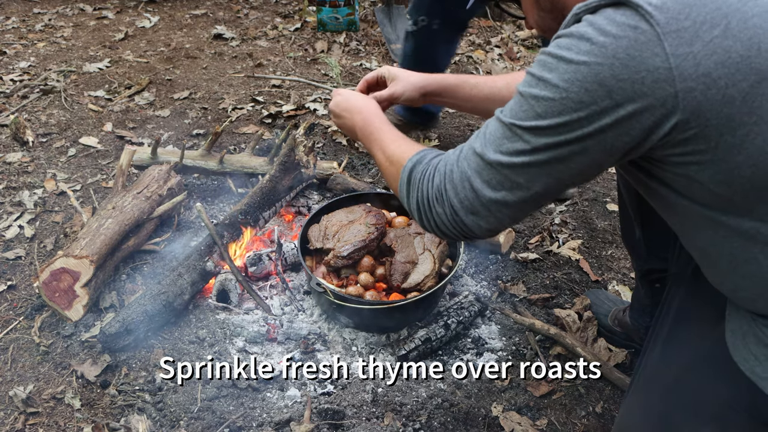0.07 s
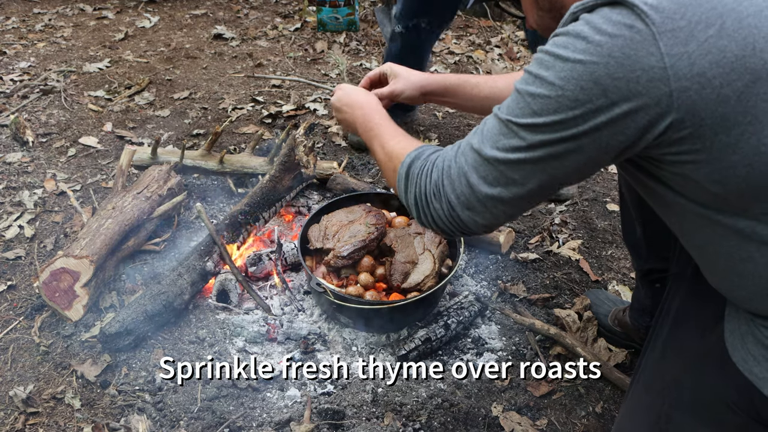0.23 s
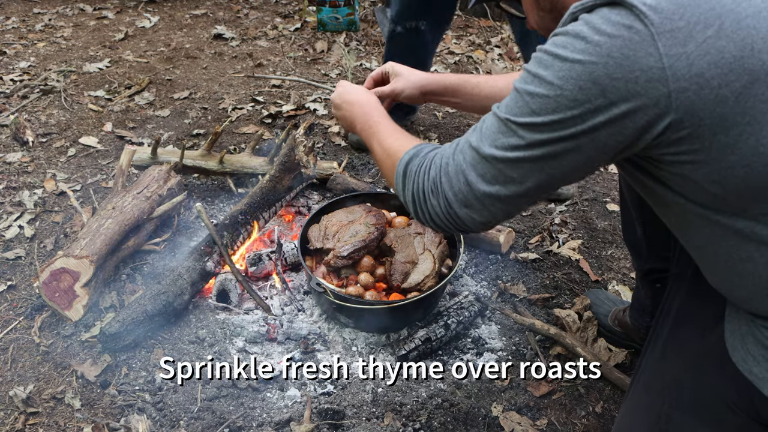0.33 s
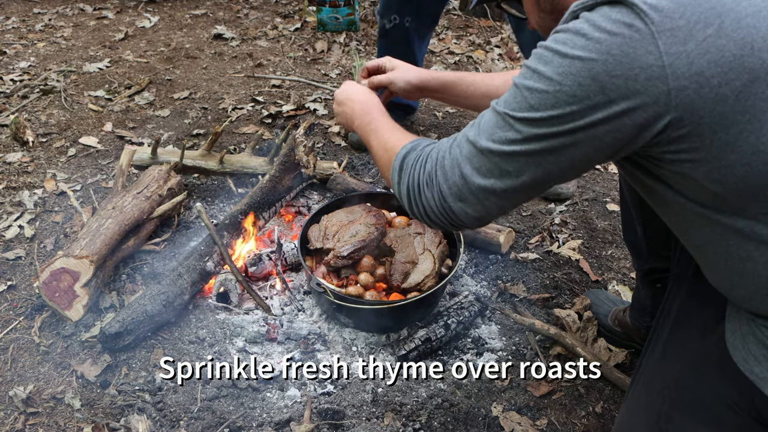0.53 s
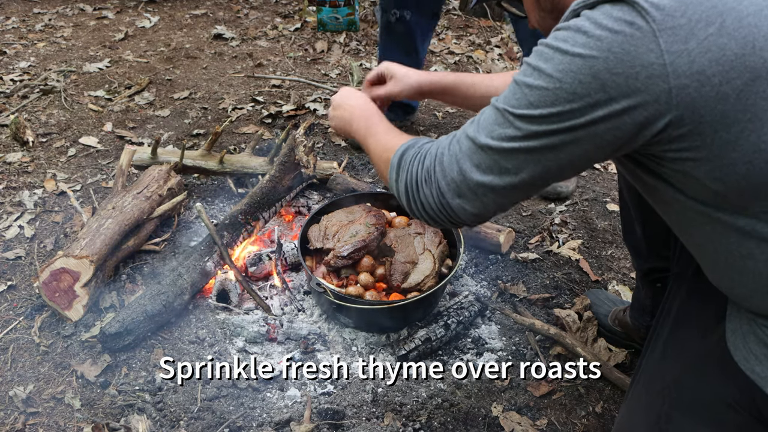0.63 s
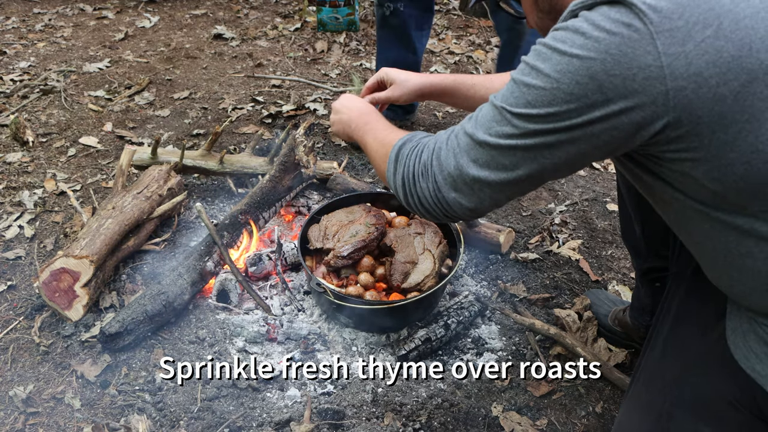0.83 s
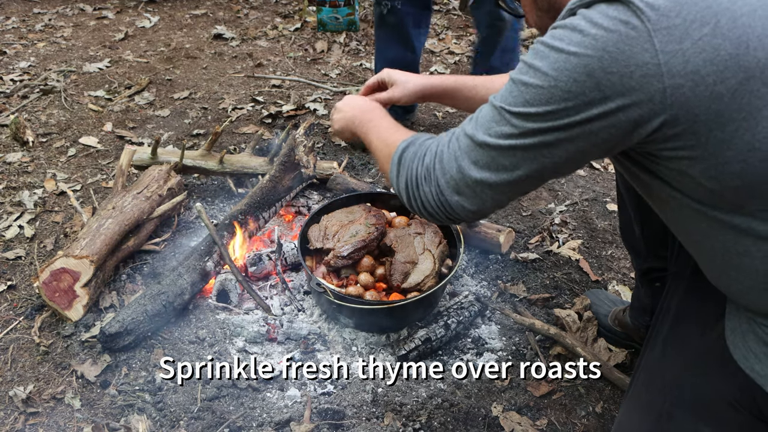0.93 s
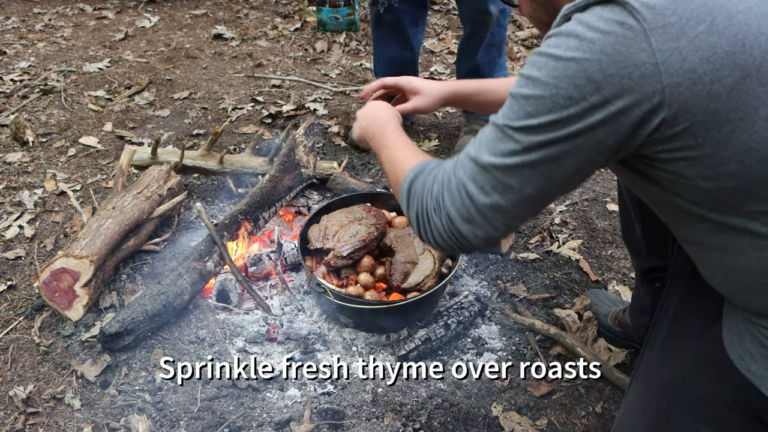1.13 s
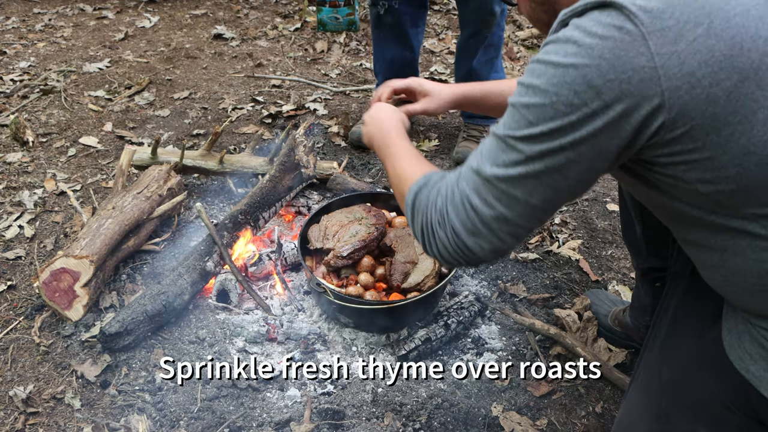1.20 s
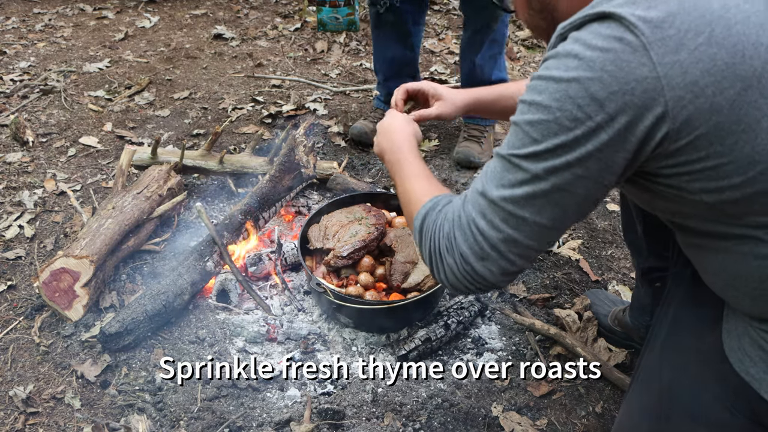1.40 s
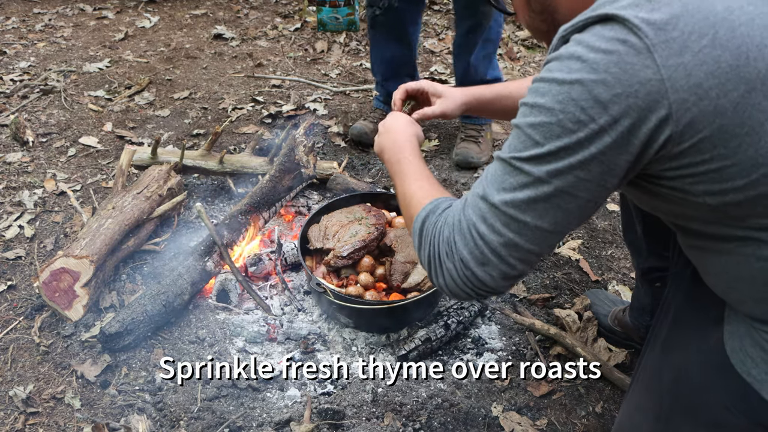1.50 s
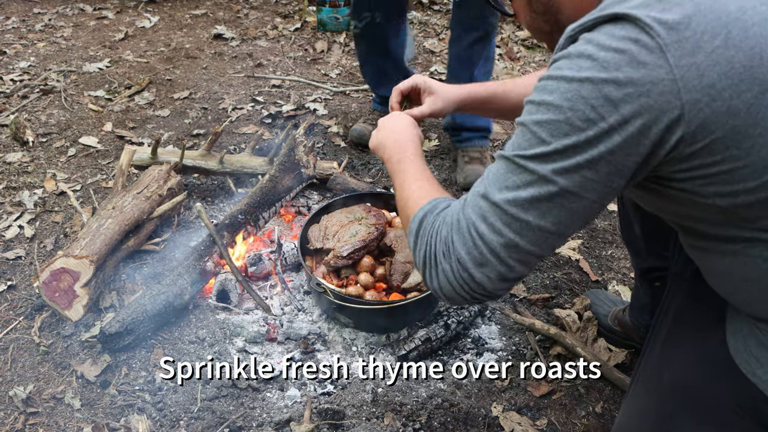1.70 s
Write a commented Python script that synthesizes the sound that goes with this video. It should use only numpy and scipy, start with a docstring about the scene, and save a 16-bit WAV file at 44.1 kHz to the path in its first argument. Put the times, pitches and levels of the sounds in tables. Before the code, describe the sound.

Meat sizzling densely in a heavy pot on a campfire, with crackles and a wind thump

```python
"""A dense sizzle in surges comes first: a roast in a heavy pot on a campfire, over a low outdoor murmur.
Countless random steam bursts, hiss and short bubble rings make the sizzle; filtered noise makes the murmur.
A puff of air soon buffets the microphone with a dull thump: damped low swings inside a swell of noise.
Sharper crackles are brief resonant noise bursts; soft knocks are damped swings.
Later, faint wavering sine tones ring underneath."""
import sys
import numpy as np
from scipy import signal
from scipy.fft import rfft, irfft
from scipy.io import wavfile

SR = 44100
rng = np.random.default_rng(int(sys.argv[2]) if len(sys.argv) > 2 else 0)


def generate_wav(sig):
    """Save sig (samples, or channels by samples) to the path in sys.argv[1] as 16-bit PCM at SR."""
    pcm = np.round(np.clip(np.atleast_2d(sig).T, -1, 1) * 32767).astype(np.int16)
    wavfile.write(sys.argv[1], SR, pcm)


N = 77175
TOP_HZ = 15650  # upper edge of the finished sound


def undb(db):
    """Decibels to gain."""
    return 10 ** (np.asarray(db) / 20)


def unit(x):
    """Scale to rms 1."""
    return x / np.sqrt(np.mean(x ** 2))


def curve(rows, axis=1):
    """One column of a time table at every sample."""
    rows = np.array(rows, float)
    return np.interp(np.arange(N) / SR, rows[:, 0], rows[:, axis])


def freqs():
    """Frequency of each spectral bin in Hz, kept above zero."""
    return np.maximum(np.fft.rfftfreq(N, 1 / SR), 1)


def shape(points):
    """A frequency table at every bin, interpolated over log frequency."""
    hz, value = np.array(points, float).T
    return np.interp(np.log(freqs()), np.log(hz), value)


def filtered(x, gain):
    """Apply a gain per bin."""
    return irfft(rfft(x) * gain, N)


def resonance(hz, q):
    """Response of a band-pass."""
    return 1 / (1 + 1j * q * (freqs() / hz - hz / freqs()))


def pan(db):
    """Left and right gains for a level difference, left minus right."""
    return undb(np.array([[.5], [-.5]]) * db)


def since(start):
    """Seconds since a moment, zero before it."""
    return np.maximum(np.arange(N) / SR - start, 0)


def walk(rate):
    """Smooth random wandering of rms 1; rate is its corner in Hz."""
    return unit(filtered(rng.standard_normal(N), 1 / (1 + (freqs() / rate) ** 2)))


def air(likeness):
    """Stereo noise with a shared part, likeness being its share of the power."""
    noise = rng.standard_normal((3, N))
    return np.sqrt(likeness) * noise[2] + np.sqrt(1 - likeness) * noise[:2]


def thud(start, hz, cycles, edge_hz):
    """A sudden push that swings out within a cycle or two; peak 1."""
    turns = since(start) * hz
    swing = np.sin(2 * np.pi * turns) * np.exp(-turns / cycles)
    low_cut = 1j * freqs() / (hz / 2 + 1j * freqs())
    soft_edge = 1 / np.sqrt(1 + (freqs() / edge_hz) ** 4)
    x = filtered(swing, low_cut * soft_edge)
    return x / np.abs(x).max()


BUBBLE_LOW_HZ, BUBBLE_HIGH_HZ = 1494.6, 12840
BUBBLE_CYCLES, BUBBLE_SPREAD_DB = 44, 0.5  # cycles of decay, unevenness of level


def bubbles(count=900):
    """Small bubbles ring briefly as they burst, at random times and pitches, each rising slightly."""
    t = np.arange(SR // 20) / SR
    out = np.zeros((2, N + len(t)))
    for when, pitch, size, side in rng.random((count, 4)):
        hz = BUBBLE_LOW_HZ * (BUBBLE_HIGH_HZ / BUBBLE_LOW_HZ) ** pitch
        turns = hz * t
        tone = np.sin(2 * np.pi * turns * (1 + 1.16 * t))
        ring = tone * np.exp(-turns / BUBBLE_CYCLES) * hz ** 0.93  # higher rings are stronger
        level = undb(-BUBBLE_SPREAD_DB * np.log(size + 0.0087))
        i = int(when * N)
        out[:, i:i + len(t)] += ring * level * pan(12 * (side - .5))
    return unit(out[:, :N])


SPUTTER_DB, SPUTTER_RATE_HZ, SPUTTER_BAND_HZ = 1.5, 9, 400  # rms swing, its corner, band spacing


def sputter(x):
    """The fat sputters: narrow overlapping ranges swell and sink, each by itself."""
    place, spectrum = freqs() / SPUTTER_BAND_HZ, rfft(x)
    out = 0
    for k in range(TOP_HZ // SPUTTER_BAND_HZ + 2):
        band = irfft(spectrum * np.maximum(1 - np.abs(place - k), 0), N)
        out = out + band * undb(SPUTTER_DB * walk(SPUTTER_RATE_HZ))
    return out


POT_ECHO_DB, POT_ECHO_S = -11.5, 0.0033  # total echo energy against the direct sound, decay


def pot_walls(x):
    """The pot walls throw the sizzle back within milliseconds and ripple its spectrum."""
    t = since(0)
    echoes = rng.standard_normal(N) * np.exp(-t / POT_ECHO_S) * (t > .001)
    echoes = echoes / np.sqrt(np.sum(echoes ** 2))
    return filtered(x, 1 + undb(POT_ECHO_DB) * rfft(echoes))


# relative colour of the sizzle: f/Hz, level/dB per Hz
SIZZLE_COLOUR = [(80, -34), (250, -8.5), (550, -2), (900, -0.5), (1300, 0), (2100, 0.4), (2700, 1.5),
                 (3300, -2), (3900, -5), (4600, -2.5), (5400, -5.5), (7200, -3.5), (9500, -6.5),
                 (11400, -1), (13000, -1.5), (14200, -8), (15700, -16)]
# stereo tilt of that colour: f/Hz, left minus right/dB (before the hiss pan)
SIZZLE_BALANCE = [(300, -5), (900, 0.5), (1600, -2.5), (2700, -2.5), (3300, -2), (5000, -10.5), (7700, -13),
                  (11000, -2), (13000, 2), (15500, 10)]
# power share of bursts and steam common to both channels: f/Hz, share/0-1
SIZZLE_LIKENESS = [(300, 0.47), (1200, 0.72), (3000, 0.48), (5000, 0.48), (8000, 0.31), (12000, 0)]
# surges of the sizzle, before trim and pan: t/s, body level/dB, hiss level/dB, fizz level/dB
SIZZLE_SURGES = [(0.0, -48.5, -50, -52), (0.052, -47, -46.5, -55.5), (0.15, -46, -46, -52),
                 (0.31, -47, -44.5, -51), (0.385, -47.5, -47.5, -54), (0.424, -49, -50, -54.5),
                 (0.455, -49.5, -52, -50.5), (0.486, -49, -47, -54.5), (0.56, -50, -50.5, -52.5),
                 (0.658, -47.5, -48, -52.5), (0.686, -48.5, -46, -53.5), (0.74, -49, -51, -52.5),
                 (0.818, -50.5, -51.5, -53), (1.0, -49.5, -51.5, -54), (1.09, -47, -50.5, -53.5),
                 (1.11, -49, -47.5, -50), (1.212, -49.5, -51.5, -53.5), (1.29, -48.5, -51.5, -56),
                 (1.33, -47.5, -51.5, -55), (1.4, -48, -49, -54), (1.466, -44.5, -47, -49.5),
                 (1.558, -49.5, -46.5, -52), (1.61, -49.5, -47, -51.5), (1.672, -51, -52, -52),
                 (1.734, -46.5, -46, -52), (1.75, -49, -57, -49)]
# extra pan of the hiss: t/s, left minus right/dB
HISS_SIDE = [(0, 13), (.15, 10.5), (.42, 7), (.68, 11.5), (.8, 8.5), (1.15, 12), (1.75, 9)]
BODY_TOP_HZ, HISS_TOP_HZ = 3740, 9140
HISS_TRIM_DB, FIZZ_TRIM_DB, BUBBLE_DB = 1.5, 1.5, -13.5
BURSTS_PER_S, BURST_SPREAD_DB = 5000, 3  # bursts in each of three noise layers, unevenness of size
STEAM_SHARE, FLICKER_DB = 0.38, 0.07  # power share of smooth hiss, rms level flicker


def sizzle():
    """Tiny steam bursts of very unequal size and ringing bubbles over smooth hiss, surging in three ranges."""
    size = undb(BURST_SPREAD_DB * np.minimum(rng.exponential(size=(3, N)), 6))
    happens = rng.random((3, N)) < BURSTS_PER_S / SR
    bursts = unit(happens * size * rng.choice([-1, 1], (3, N)))
    steam = rng.standard_normal((3, N))
    fat = np.sqrt(1 - STEAM_SHARE) * bursts + np.sqrt(STEAM_SHARE) * steam

    common = np.clip(shape(SIZZLE_LIKENESS), 0, 1)
    stereo = filtered(fat[2], np.sqrt(common)) + filtered(fat[:2], np.sqrt(1 - common))
    in_pot = pot_walls(sputter(stereo + undb(BUBBLE_DB) * bubbles()))
    colour = undb(shape(SIZZLE_COLOUR)) * pan(shape(SIZZLE_BALANCE))
    x = filtered(in_pot, colour) * undb(FLICKER_DB * walk(44))

    below_hiss = 1 / (1 + (freqs() / BODY_TOP_HZ) ** 10)
    below_fizz = 1 / (1 + (freqs() / HISS_TOP_HZ) ** 10)
    body = unit(filtered(x, below_hiss)) * undb(curve(SIZZLE_SURGES, axis=1))
    hiss = unit(filtered(x, below_fizz - below_hiss)) * undb(HISS_TRIM_DB + curve(SIZZLE_SURGES, axis=2))
    fizz = unit(filtered(x, 1 - below_fizz)) * undb(FIZZ_TRIM_DB + curve(SIZZLE_SURGES, axis=3))
    return body + hiss * pan(curve(HISS_SIDE)) + fizz


# relative colour of the low noise: f/Hz, level/dB per Hz
LOW_COLOUR = [(25, -2), (60, -13), (110, 2), (180, 3), (260, 1.5), (370, -1.5), (520, -10), (900, -3),
              (2000, -67)]
# swell of the low noise: t/s, level/dB
LOW_SWELL = [(0, -53.5), (.3, -60.5), (.45, -68.5), (1.0, -63.5), (1.11, -61), (1.17, -52.5), (1.25, -54.5),
             (1.45, -57.5), (1.75, -52.5)]


def low_noise():
    """Low noise of fire and air, alike in both channels."""
    return unit(filtered(air(1.0), undb(shape(LOW_COLOUR)))) * undb(curve(LOW_SWELL))


# swell of the hollow murmur, before its waver: t/s, level/dB
MURMUR_SWELL = [(0, -63), (.95, -62.5), (1.16, -54), (1.3, -58.5), (1.75, -57.5)]
MURMUR_HZ, MURMUR_Q, MURMUR_WAVER_DB = 365.6, 2.94, 3


def murmur():
    """A hollow murmur: noise through a doubled resonance, its level wavering."""
    hollow = unit(filtered(air(0.91), resonance(MURMUR_HZ, MURMUR_Q) ** 2))
    return hollow * undb(curve(MURMUR_SWELL) + MURMUR_WAVER_DB * walk(8.2))


# coming and going of the deep rumble: t/s, level/dB
RUMBLE_SWELL = [(0, -60), (.3, -45.5), (.52, -77), (1.1, -90), (1.28, -56), (1.42, -56.5), (1.5, -71),
                (1.75, -69)]
RUMBLE_HZ, RUMBLE_Q = 79, 1.16


def rumble():
    """A deep rumble: wide noise through a doubled low resonance."""
    deep = unit(filtered(air(0.094), resonance(RUMBLE_HZ, RUMBLE_Q) ** 2))
    return deep * undb(curve(RUMBLE_SWELL))


# eddies striking the microphone, peak level before pan:
# t/s, level/dB, f/Hz, left minus right/dB, upper edge f/Hz
EDDIES = [(0.1352, -25, 114, -22, 696), (0.152, -34, 125, 0, 300), (0.172, -31.5, 115, 22, 300),
          (0.179, -22, 144, -13.5, 800), (0.2013, -17, 92, 6.5, 350), (0.2124, -23.5, 94, 13.5, 400),
          (0.2253, -20, 197, -10.5, 1500), (0.257, -31, 95, 16, 300), (.272, -26.5, 79.6, -11.5, 300),
          (0.292, -42, 60, -10, 160), (.461, -52.5, 111, 7, 400), (1.246, -40, 150, 7, 400),
          (1.279, -34.5, 113, -7, 300), (1.288, -43.5, 108, 0, 200), (1.39, -44, 112, 16, 400),
          (1.416, -43.5, 109, -8, 400)]
# relative colour of the puff's turbulence: f/Hz, level/dB per Hz
PUFF_COLOUR = [(20, -22), (45, -4), (90, -6), (160, -2), (300, -21), (600, -47), (1500, -66)]
EDDY_CYCLES, PORT_LAG_S = 0.49, 0.0021  # decay of each swing, delay of the weaker port
PUFF_DB, PUFF_S, PUFF_WIDTH_S = -35.5, 0.185, 0.066  # rms at full swell, centre, half-width


def wind():
    """Eddies hit one microphone port first and hardest, then the other, with a brief swell of turbulence."""
    eddies = 0
    for start, db, hz, side, edge_hz in EDDIES:
        left = thud(start + PORT_LAG_S * (side < 0), hz, EDDY_CYCLES, edge_hz)
        right = thud(start + PORT_LAG_S * (side > 0), hz, EDDY_CYCLES, edge_hz)
        eddies = eddies + np.array([left, right]) * undb(db) * pan(side)
    swell = np.exp(-((since(0) - PUFF_S) / PUFF_WIDTH_S) ** 6)
    turbulence = unit(filtered(air(0), undb(shape(PUFF_COLOUR))))
    return eddies + turbulence * swell * undb(PUFF_DB)


# spits and snaps, peak level before pan:
# t/s, level/dB, centre f/Hz, resonance Q, decay before the resonance/s, left minus right/dB
SPITS_AND_SNAPS = [(.158, -31.5, 8000, 2, 0.0085, -3), (.2808, -25, 1590, 0.87, 0.0011, -5),
                   (0.3125, -30, 13000, 2, .001, 10), (0.387, -30.5, 1370, 2.8, 0.0018, 3),
                   (.456, -37, 12000, 2, .002, -2), (.666, -36, 12000, 2, .005, 7),
                   (.684, -38, 13500, 2, 0.0099, 8), (.71, -36, 12900, 7, 0.0035, 6),
                   (.8735, -35, 5700, 1.5, 0.0038, 4), (1.11, -42, 6600, 1.7, .003, 16),
                   (1.128, -43, 2600, 1.2, 0.0033, 26), (1.175, -41, 6950, 1.3, 0.0033, 22),
                   (1.456, -32.5, 1100, 3, .004, -1), (.897, -42, 2700, 13, 0.03, -3),
                   (1.499, -38, 2530, 4.8, 0.0032, -2), (1.588, -38.5, 12950, 14, 0.032, 11),
                   (1.5903, -31, 13300, 4.3, .0007, 11), (1.6208, -34, 1800, 1, .0015, -4)]


def crackles():
    """Spits of fat and snaps of embers: resonant noise bursts from a dry tick to a thin fizz."""
    out = 0
    for start, db, hz, q, decay, side in SPITS_AND_SNAPS:
        t = since(start)
        burst = air(0.74) * (t > 0) * np.exp(-t / decay)
        x = filtered(burst, resonance(hz, q))
        out = out + x / np.abs(x).max() * undb(db) * pan(side)
    return out


# soft knocks: t/s, peak level/dB, f/Hz, upper edge f/Hz
SOFT_KNOCKS = [(.305, -37, 444, 700), (0.4137, -38, 200, 3000), (0.5255, -45, 217, 2000),
               (1.281, -37.5, 326, 700), (1.621, -42.5, 307, 1200), (1.631, -42, 300, 1200)]
KNOCK_CYCLES = 0.64  # decay of each swing


def knocks():
    """Small dull knocks of movement near the fire, each a quickly damped swing."""
    return sum(thud(start, hz, KNOCK_CYCLES, edge_hz) * undb(db) for start, db, hz, edge_hz in SOFT_KNOCKS)


# faint rings, level before attack and decay: t/s, f/Hz, level/dB, decay/s
FAINT_RINGS = [(1.04, 793, -52, 0.043), (1.16, 800, -47, 0.033), (1.35, 793, -48, 0.04),
               (1.435, 994, -51.5, 0.18), (1.45, 790, -51, 0.04), (1.53, 964, -53, 0.046)]
RING_ATTACK_S, RING_WAVER_RAD = 0.0042, 0.2


def rings():
    """Faint ringing under the sizzle: decaying sines with a slightly unsteady phase."""
    out = 0
    for start, hz, db, decay in FAINT_RINGS:
        t = since(start)
        envelope = (1 - np.exp(-t / RING_ATTACK_S)) * np.exp(-t / decay)
        tone = np.sin(2 * np.pi * hz * t + RING_WAVER_RAD * walk(25))
        out = out + undb(db) * envelope * tone
    return out


def scene():
    """Everything at the microphone."""
    cooking = sizzle() + crackles()
    thumps = wind() + knocks()
    background = low_noise() + murmur() + rumble()
    return cooking + thumps + background + rings()


LOW_CUT_HZ = 66


def record(dry):
    """The recorder thins the deepest bass and cuts the top steeply."""
    thin = filtered(dry, 1 / np.sqrt(1 + (LOW_CUT_HZ / freqs()) ** 4))
    return signal.sosfilt(signal.ellip(12, .1, 90, TOP_HZ, fs=SR, output="sos"), thin)


dry = scene()
out = record(dry)
generate_wav(out)
```